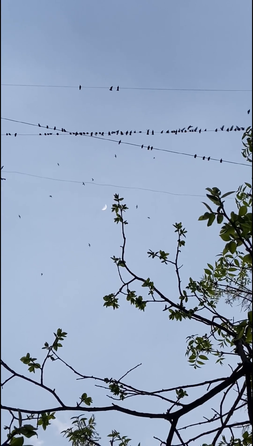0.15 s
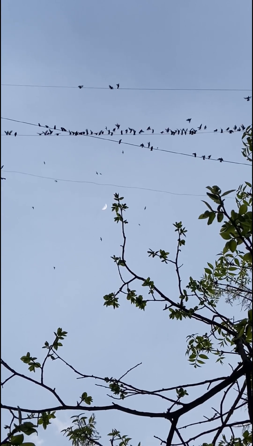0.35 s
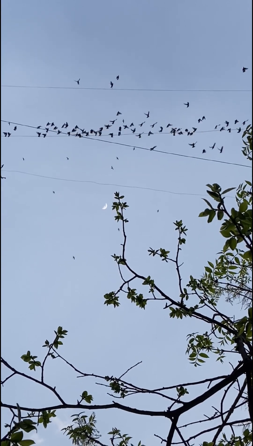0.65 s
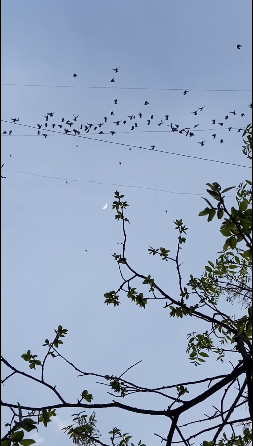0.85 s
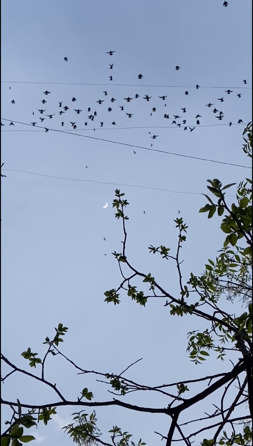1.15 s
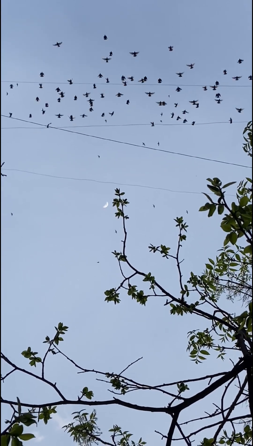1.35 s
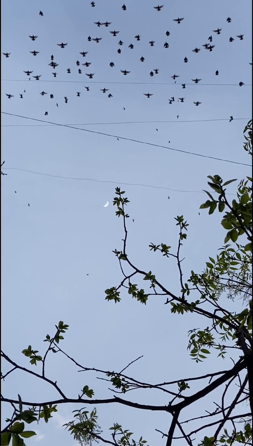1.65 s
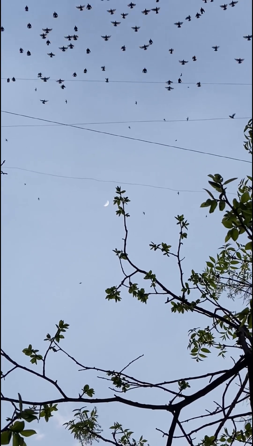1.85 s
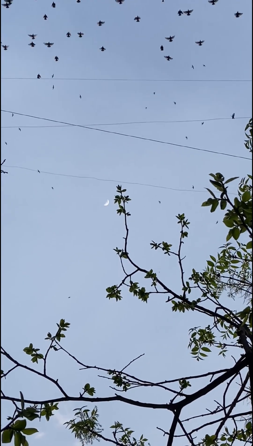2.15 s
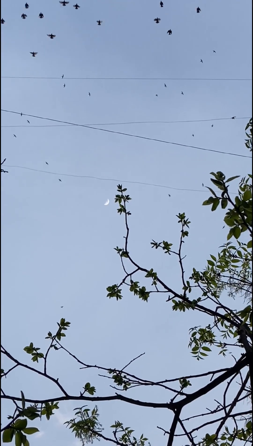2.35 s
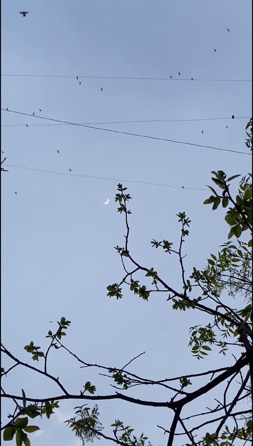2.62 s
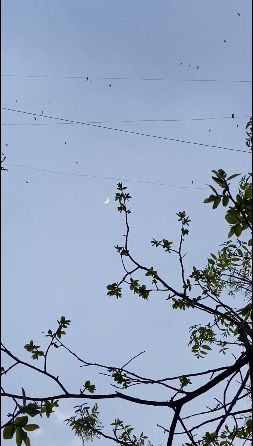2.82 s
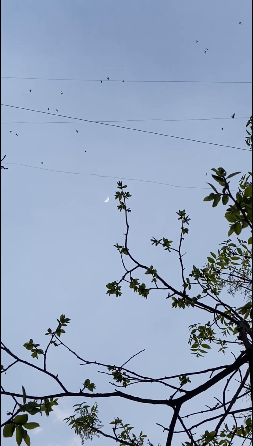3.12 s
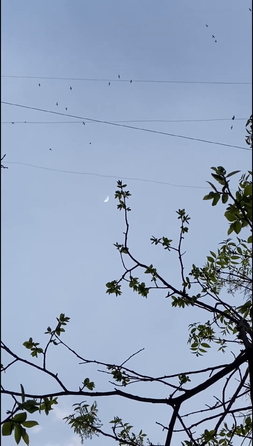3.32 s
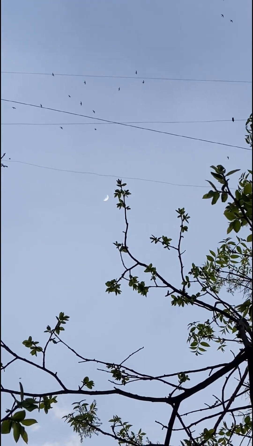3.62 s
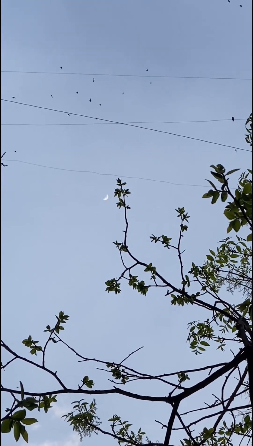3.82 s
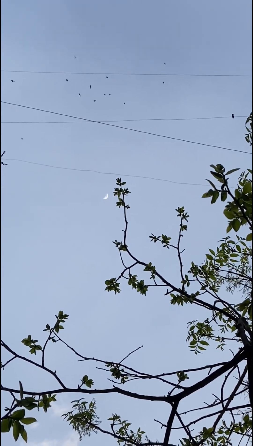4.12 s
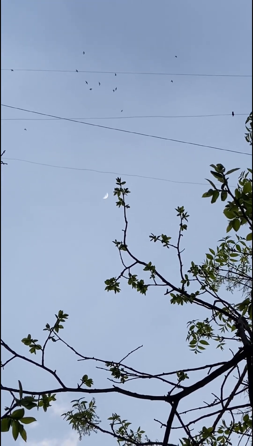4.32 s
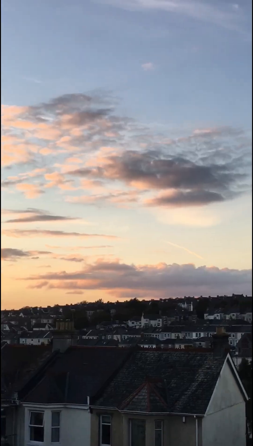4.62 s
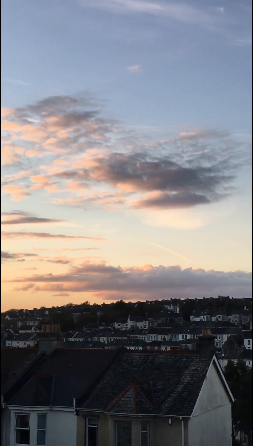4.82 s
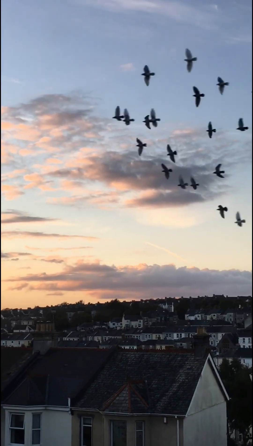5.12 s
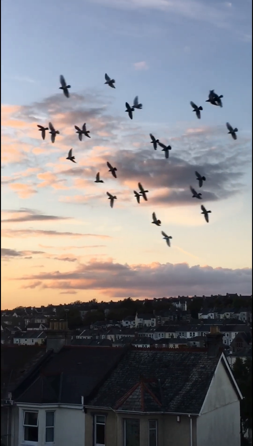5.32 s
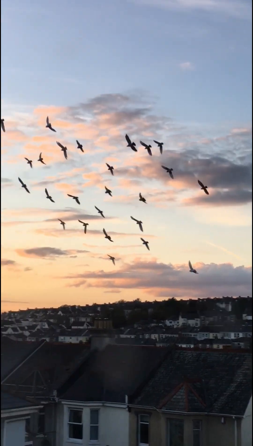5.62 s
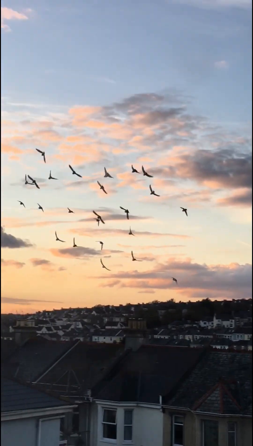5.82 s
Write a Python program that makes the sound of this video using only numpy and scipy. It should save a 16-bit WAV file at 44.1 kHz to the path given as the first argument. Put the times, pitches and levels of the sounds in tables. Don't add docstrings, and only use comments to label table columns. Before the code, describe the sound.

Short yodelling bird whistles, overlapping with their own delayed copies left and right, sound over gusty low wind and microphone thumps; a few soft low moans lie between. The cries thin out, everything stops for a moment, and a wide, reverberant roost of many small caws begins over steady distant town noise, deep traffic-like rumble and a brief airy flutter of wings.

```python
import sys
import numpy as np
from scipy import signal
from scipy.fft import rfft, irfft, next_fast_len
from scipy.io import wavfile
from scipy.ndimage import map_coordinates

SR = 44100
rng = np.random.default_rng(int(sys.argv[2]) if len(sys.argv) > 2 else 0)


def put_to_file(sound):
    columns = np.atleast_2d(sound).T
    safe = np.clip(columns, -1, 1)
    whole_steps = np.round(safe * 32767)
    wavfile.write(sys.argv[1], SR, whole_steps.astype(np.int16))


def field_ratio(decibels):
    return 10 ** (np.asarray(decibels, dtype=float) / 20)


N = 263277
RETURN_S = 4.527


def unit(x):
    return x / np.sqrt(np.mean(x ** 2) + 1e-20)


def along(points, hz):
    f, v = np.transpose(points)
    return np.interp(np.log(hz + 1), np.log(f + 1), v)


def curves(rows, t):
    s, *cols = np.transpose(rows)
    return [np.interp(t, s, c) for c in cols]


def wobble(rate, size):
    knots = rng.standard_normal(int(size * rate / SR) + 4)
    return map_coordinates(knots, [np.arange(size) * rate / SR])


def filtered(x, response):
    m = next_fast_len(x.shape[-1] + SR // 2)
    spectrum = rfft(x, m) * response(np.fft.rfftfreq(m, 1 / SR))
    return irfft(spectrum, m)[..., :x.shape[-1]]


def noise(spectrum, size):
    return unit(filtered(rng.standard_normal(size), lambda hz: field_ratio(along(spectrum, hz))))


def wide(spectrum, alike):
    def mid_and_side(hz):
        turn = np.arccos(np.clip(along(alike, hz), -1, 1)) / 2
        return field_ratio(along(spectrum, hz)) * [np.cos(turn), np.sin(turn)]

    mid, side = filtered(rng.standard_normal((2, N)), mid_and_side)
    return unit(np.array([mid + side, mid - side]))


def tail(t60, channels):
    t = np.arange(SR // 2) / SR
    answer = rng.standard_normal((channels, len(t))) * field_ratio(-60 * t / t60)
    return answer / np.linalg.norm(answer[0])


def wind(t):
    # time in seconds, level in dB.
    gust = [(-1.45, -32), (-1.25, -43), (-1.13, -35), (-.8, -38), (-.45, -32), (-.1, -40), (.15, -36),
            (.3, -45), (.72, -36), (.85, -43), (1.0, -32), (1.35, -28), (1.65, -27), (1.85, -34),
            (2.05, -32), (2.3, -37), (2.65, -33), (3.3, -52)]
    # time in seconds, buffeting over rumble in dB.
    facing = [(-1.4, -2), (-.4, -4), (.5, -13), (1.1, -7), (1.9, -7), (2.4, 6), (2.7, -13), (3.5, -2)]
    # time in seconds, level in dB.
    slap_hits = [(-.64, -40), (-.52, -29.5), (.935, -38), (1.293, -25.5), (1.399, -24.5), (1.64, -29),
                 (1.834, -23), (2.096, -25), (2.28, -25)]
    # frequency in Hz, density in dB per Hz.
    rumble_colour = [(12, -28), (22, -1), (60, 0.5), (110, -4.5), (160, -11), (300, -53.5)]
    buffet_colour = [(60, -20.5), (120, 0.5), (200, -2), (320, -9), (500, -19.5), (800, -26.5),
                     (1300, -46.5)]
    air_colour = [(400, -22.5), (800, 2), (1300, 8.5), (1900, -12), (2700, 1), (4000, -4.5), (5200, -8.5)]
    size = len(t)
    rumble_db, = curves(gust, t)
    buffet_db = rumble_db + curves(facing, t)[0]
    rumble = field_ratio(rumble_db) * unit(field_ratio(1.3 * wobble(12, size)) * noise(rumble_colour, size))
    lumps = unit(field_ratio(3.67 * wobble(45, size)))
    slaps = sum(field_ratio(db) * np.exp(-((t - s) / .006) ** 2) for s, db in slap_hits)
    buffet = (field_ratio(buffet_db) * lumps + slaps) * noise(buffet_colour, size)
    air = field_ratio(-55 + 1.2 * wobble(3.5, size)) * noise(air_colour, size)
    return rumble + buffet + air


def throat(hz):
    # centre in Hz, width in Hz, level in dB.
    resonances = [(1250, 440, 0), (2400, 300, -11), (2760, 460, 0), (3450, 380, -9), (4080, 290, -9.5),
                  (4500, 450, -20), (5300, 300, -15)]
    power = sum(field_ratio(2 * db) / (1 + (2 * (hz - centre) / width) ** 2) ** 2
                for centre, width, db in resonances)
    return np.sqrt(power)


def gull(t):
    # leap to the top note in seconds, hold in seconds, fall in seconds, top note in Hz, level in dB.
    cries = [(-.86, .062, .076, 1162, -29.5), (-.375, .11, .036, 1164, -27.5),
             (-.025, .117, .034, 1156, -27.5), (.296, .112, .046, 1260, -27.5),
             (.622, .095, .06, 1430, -21), (.927, .067, .06, 1412, -23), (1.232, .08, .059, 1434, -22.5),
             (1.547, .062, .084, 1474, -26), (1.866, .07, .094, 1485, -25.5),
             (2.206, .075, .084, 1484, -26), (2.546, .071, .113, 1486, -28.5),
             (2.925, .067, .135, 1485, -28.5), (3.42, .055, .123, 1510, -33.5)]
    lead_in_s, chest_hz, chest_climb_hz = .042, 1030, 140
    rest_hz, sag_s, weak_db = 1050, .105, -29
    slip_s = .01
    overtone_db = -28.5
    out = np.zeros(len(t))
    for leap, hold, fall, top_hz, db in cries:
        on = (t >= leap - lead_in_s) & (t < leap + hold + fall)
        size = on.sum()
        u = t[on] - leap
        since, left = u + lead_in_s, hold + fall - u
        past, early = np.maximum(u - hold, 0), np.clip(1 - u / hold, 0, 1)
        high = np.clip((top_hz - chest_hz - chest_climb_hz) / 240, 0, 1)
        weak = max(weak_db - db, 0)

        risen = .5 + .5 * np.tanh(u / (.003 + .08 * max(fall - .09, 0)))
        breaking = np.exp(-(left / (.02 * (1 - high / 2))) ** 2)
        chest = chest_hz + chest_climb_hz * np.minimum(since / lead_in_s, 1)
        droop = 22 * (1 - high) * (1 - early) ** 2
        settling = 42 * np.exp(-np.maximum(u, 0) / .02)
        slip = high * 45 * (1 - np.exp(-past / slip_s))
        held = top_hz - droop - settling - slip
        sag = np.exp(-past / sag_s * field_ratio(1.15 * weak))
        head = rest_hz + (held - rest_hz) * sag - 265 * breaking
        pitch = chest + (head - chest) * risen

        attack_db = 26 * np.maximum(1 - since / .022, 0)
        leap_dip_db = high * 12 * np.exp(-(u / .011) ** 2)
        release_db = 22 * np.maximum(1 - left / (.008 * (1.8 - high)), 0)
        shape_db = -attack_db - leap_dip_db - release_db

        over_db = overtone_db + .25 * (db - overtone_db) - 10 * (1 - high) * (1 - risen) - 30 * breaking
        dull_db = high ** 3 * risen * .14 * max(1490 - top_hz, 0) * np.exp(-past / slip_s)
        third_loss_db = 6 * early * risen + np.clip((1255 - pitch) / 8, 0, 12) - 40 * breaking
        third_db = over_db - 1.8 * dull_db - high ** 2 * third_loss_db
        chest_db = -28 - 3 * (1 - high) - 2.2 * weak
        first_db = chest_db + risen * (db - 4 * high * early - chest_db)
        second_db = over_db - high * dull_db
        fourth_db = over_db - 3 * (1 + 4 * high ** .5)
        levels = field_ratio([first_db, second_db, third_db, fourth_db])

        turn = 2 * np.pi * np.cumsum(pitch * (1 + 0.0052 * wobble(90, size))) / SR
        voice = np.zeros(size)
        for k, level in enumerate(levels, 1):
            voice += level * throat(k * pitch) * field_ratio(1.5 * wobble(40, size)) * np.sin(k * turn + k)
        hoarse = 0.05 + 0.68 * np.exp(-(since / 0.034) ** 4) + .5 * np.exp(-(left / 0.0092) ** 2)
        rattle = np.exp(1.6 * np.cos(turn / 3 + 1.3 * wobble(300, size)))
        rattle = rattle * (1 + 1.2 * wobble(3000, size))
        edge = np.clip(np.minimum(since, left) / 0.002, 0, 1)
        shape = edge * field_ratio(shape_db + .8 * wobble(60, size))
        out[on] += np.sqrt(2) * shape * voice * (1 + hoarse * unit(rattle - rattle.mean()))
    return out


def moans(t):
    # start in seconds, end in seconds, start pitch in Hz, end pitch in Hz, throat resonance in Hz.
    moan_rows = [
        (-.51, -.42, 360, 392, 1500),
        (.51, .575, 400, 400, 850),
        (2.11, 2.32, 178, 206, 700),
    ]
    moan_levels = [-42, -39.5, -40.5]
    out = np.zeros(len(t))
    for (start, end, from_hz, to_hz, centre_hz), db in zip(moan_rows, moan_levels):
        on = (t >= start) & (t < end)
        u = (t[on] - start) / (end - start)
        turn = 2 * np.pi * np.cumsum(to_hz + (from_hz - to_hz) * (1 - u) ** 2) / SR
        stack = sum(np.sin(k * turn) / (1 + (np.log(k * to_hz / centre_hz) / .35) ** 2)
                    for k in range(1, 13))
        out[on] += field_ratio(db) * np.sin(np.pi * u) ** .8 * stack
    return out


def walls(bird):
    answer = field_ratio(-20) * tail(.35, channels=1)[0]
    after = np.arange(len(answer)) / SR
    near = np.exp(-((after - .043) / 0.0037) ** 2)
    far = 0.18 * np.exp(-((after - .125) / 0.018) ** 2)
    answer = answer + field_ratio(-32.5) * (near + far) * rng.standard_normal(len(answer))
    answer = filtered(answer, lambda hz: 1 / (1 + (hz / 2700) ** 4))
    return signal.fftconvolve(bird, answer)[:len(bird)]


def echo(sound, step_s):
    taps = [
        [(0, 1), (3, -1), (7, .25)],
        [(0, -1), (3, -1), (4, .5), (7, .5)],
    ]
    feedback = (7, .25)

    def late(x, steps):
        return np.pad(x, (round(steps * step_s * SR), 0))[:len(x)]

    back_steps, back_gain = feedback
    sound = filtered(sound, lambda hz: 1 / (1 + (hz / 5350) ** 60))
    sound = sum(back_gain ** k * late(sound, k * back_steps) for k in range(3))
    return np.array([sum(gain * late(sound, steps) for steps, gain in ear) for ear in taps])


def shore():
    step_s = 3 / 14
    lead = round(7 * step_s * SR)
    t = (np.arange(N + lead) - lead) / SR
    bird = gull(t) + moans(t)
    return echo(bird + walls(bird) + wind(t), step_s)[:, lead:]


def roost(t):
    # time in seconds, level in dB, pitch in Hz, hoarseness as overtones in dB.
    chatter = [(4.53, -39, 1610, -13), (4.71, -43, 1700, -5), (4.88, -38, 1920, -14),
               (4.97, -41, 1760, -21), (5.6, -38, 1880, -10), (5.78, -38, 1620, -14), (5.97, -42, 1850, -8)]
    level_db, pitch, over_db = curves(chatter, t)
    low, high = np.zeros((2, N)), np.zeros((2, N))
    u = np.linspace(0, 1, SR // 9)
    for when, tune, size, stretch, bend in rng.random((300, 5)):
        at = int((RETURN_S - .3 + when * (t[-1] - RETURN_S + .15)) * SR)
        caw = slice(at, at + len(u))
        scatter = 1.3 * (tune - .48) ** 3 + .24 * (tune - .48)
        arch = .2 * (bend - .45) * u - .1 * (u - .5) ** 2
        turn = 2 * np.pi * np.cumsum(pitch[at] * np.exp(scatter + arch)) / SR
        shape = field_ratio(6 * size) * np.sin(np.pi * u) * (1 + .45 * wobble(300, len(u)))
        angle = .5 + .57 * bend
        ears = np.array([[np.cos(angle)], [np.sin(angle)]])
        low[:, caw] += ears * shape * np.sin(turn)
        rough = 1 + .4 * wobble(500, len(u))
        high[:, caw] += ears * shape * rough * np.sin((1.2 + .9 * stretch ** 1.5) * turn)

    def wet(x):
        return x + field_ratio(-4) * signal.fftconvolve(x, tail(0.85, channels=2), axes=1)[:, :N]

    on = t > RETURN_S
    low, high = wet(low), wet(high)
    mix = low / low[:, on].std() + field_ratio(over_db + 6.5) * high / high[:, on].std()
    return field_ratio(level_db - 0.5) * mix


def town():
    # frequency in Hz, density in dB per Hz.
    hum_colour = [(60, -30), (100, -7), (275, -16), (460, -14), (850, -19.5), (1220, -14.5), (1730, -12),
                  (3500, -15), (5500, -23.5), (6200, -27.5), (6900, -37), (8300, -49), (10300, -52),
                  (15500, -57)]
    # frequency in Hz, left-right likeness.
    hum_alike = [(60, 0.99), (210, 0.71), (600, 0.32), (1370, 0.88), (2570, 1), (4800, .7), (8000, 0.61),
                 (12000, 0.84)]
    return field_ratio(-43.5 + .9 * wobble(6, N)) * wide(hum_colour, hum_alike)


def traffic(t):
    # peak in seconds, level in dB.
    swells = [
        (4.53, -28),
        (4.92, -28),
        (5.28, -33),
        (5.83, -25.5),
    ]
    fade_db_per_s = 50
    strength = sum(field_ratio(db - fade_db_per_s * abs(t - s)) for s, db in swells)
    colour = [(8, -12.5), (20, 8), (45, -11.5), (75, -11), (130, -51), (300, -89.5)]  # (Hz, dB per Hz)
    return strength * wide(colour, [(50, .9)])


def wings(t):
    # frequency in Hz, density in dB per Hz.
    feathers = [(4500, -26), (6200, -4.5), (7300, -6.5), (8300, -3.5), (9600, -13), (10400, -16),
                (11000, -50), (13000, -30), (13800, -17), (15400, -20)]
    pass_s, nearest_s = 5.385, .055
    passing = field_ratio(-58.5) / (1 + ((t - pass_s) / nearest_s) ** 2)
    flutter = field_ratio(2.8 * wobble(70, N))
    return (field_ratio(-80) + passing) * flutter * wide(feathers, [(8000, 0.58), (12000, .98)])


def scene():
    t = np.arange(N) / SR
    first = np.clip((4.434 - t) / .0012, 0, 1)
    second = np.clip((t - RETURN_S + .006) / .014, 0, 1) ** 2
    opening = field_ratio(-19) * np.exp(-t / .004)
    return first * (shore() - opening) + second * (roost(t) + town() + traffic(t) + wings(t))


def low_pass(x):
    return signal.sosfilt(signal.butter(12, 15500, fs=SR, output="sos"), x)


def record(dry):
    return low_pass(dry)


dry = scene()
out = record(dry)
put_to_file(out)
```